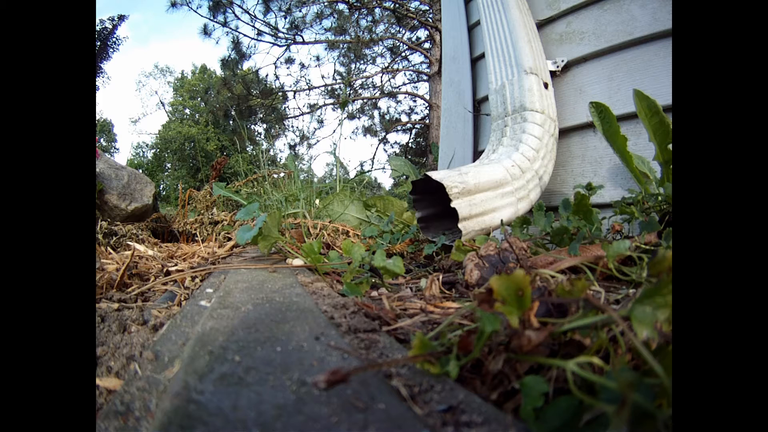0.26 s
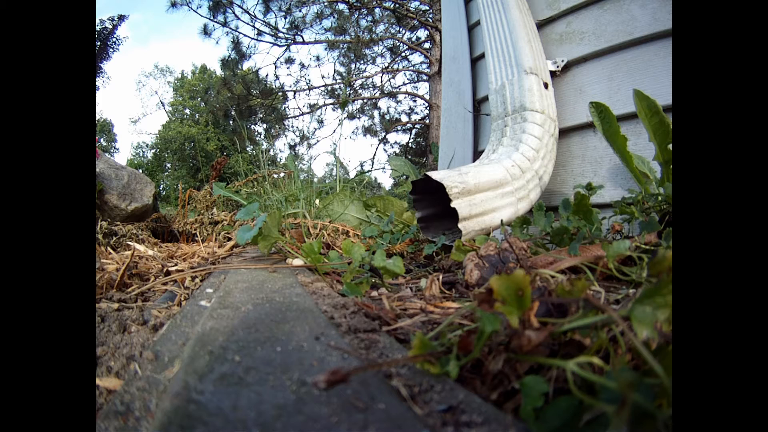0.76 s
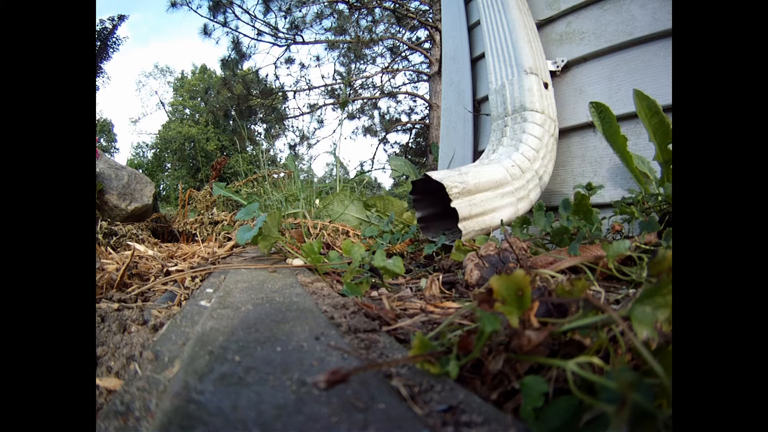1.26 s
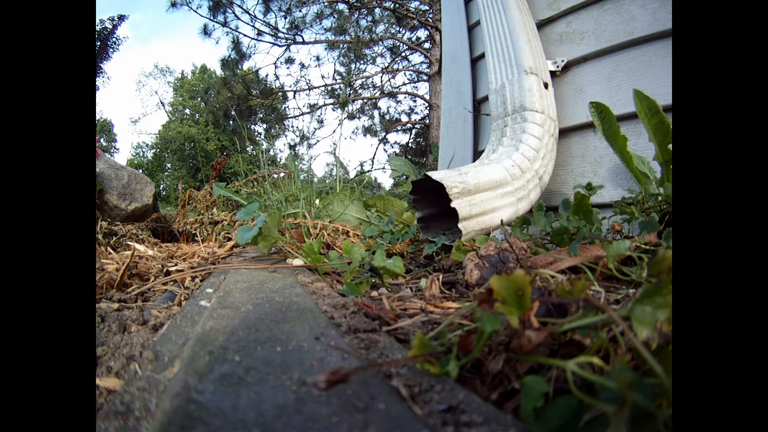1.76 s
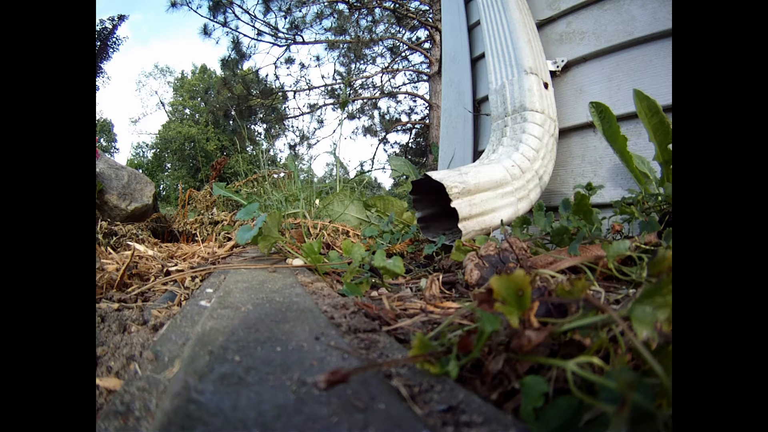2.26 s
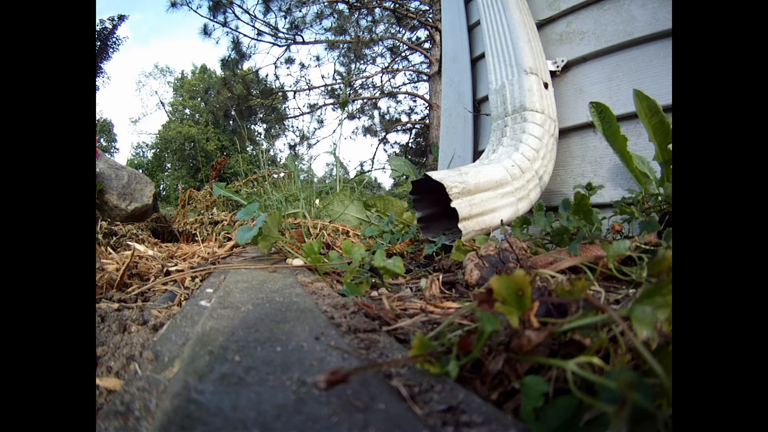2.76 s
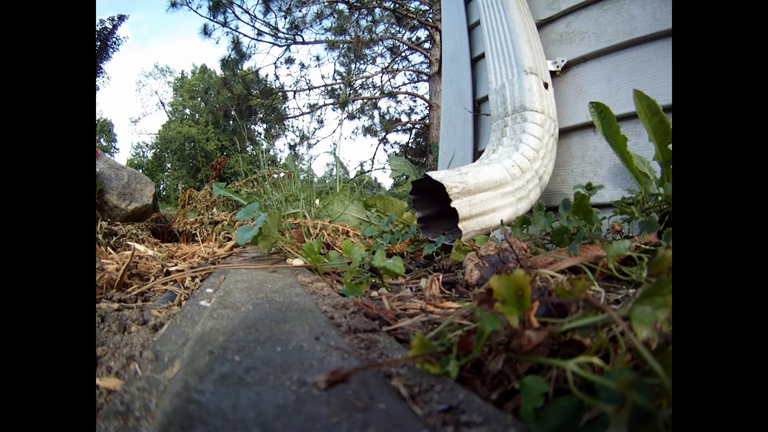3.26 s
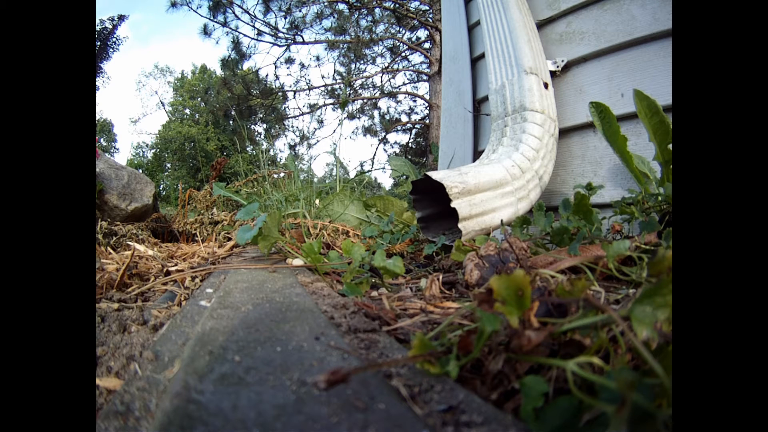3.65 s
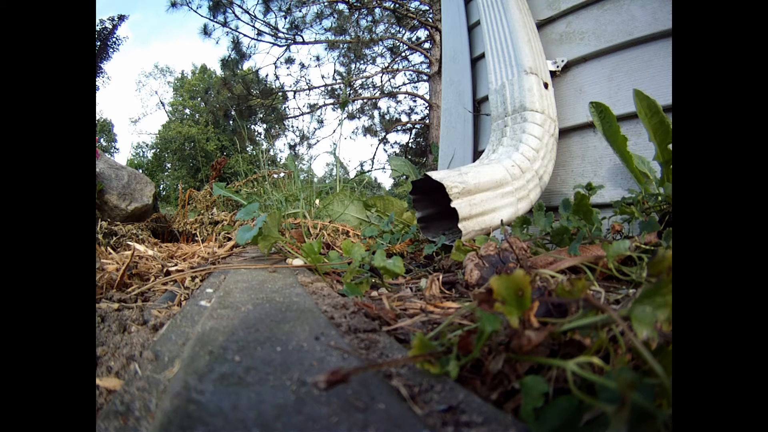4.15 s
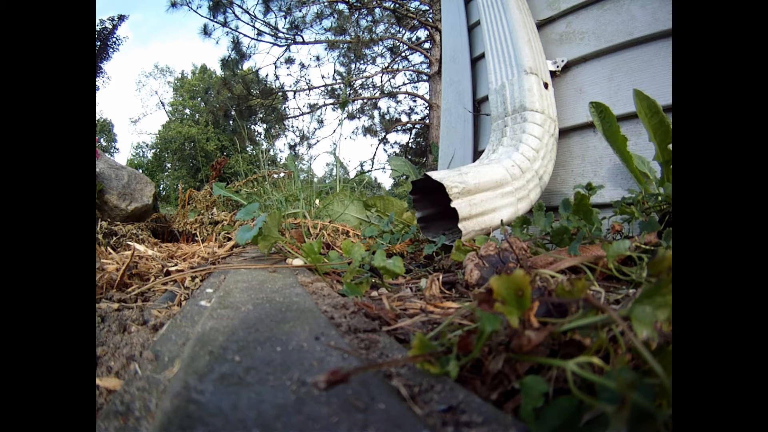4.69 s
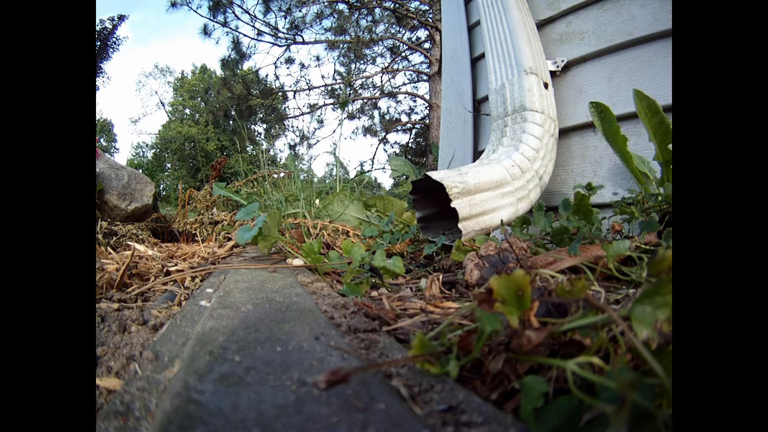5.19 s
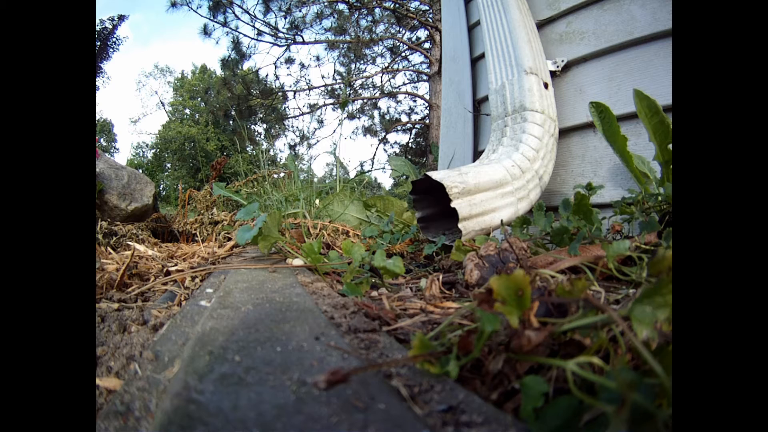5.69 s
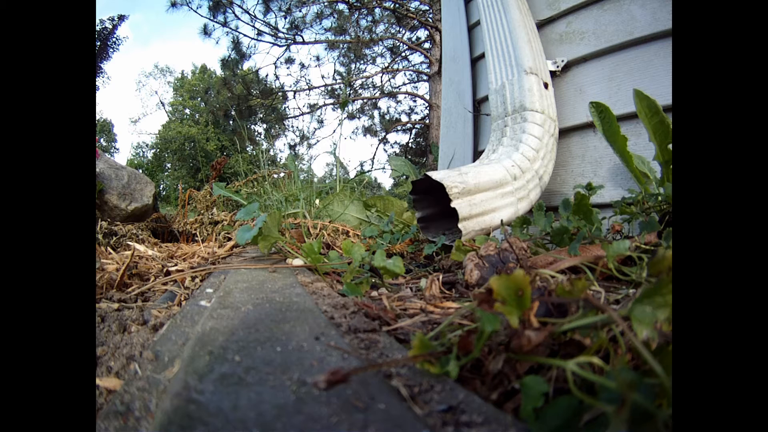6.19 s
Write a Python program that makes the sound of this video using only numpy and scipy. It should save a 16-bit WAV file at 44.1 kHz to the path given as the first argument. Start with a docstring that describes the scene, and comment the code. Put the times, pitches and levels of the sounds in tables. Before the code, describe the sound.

A steady low hum of two distant motors and a soft airy hiss run throughout this garden scene. Dry leaves scuffle faintly at the start and again around 1 second. At about 1.15 seconds a nearby chipmunk gives one sharp, high, falling chip, by far the loudest sound, with a brief overload crackle and a soft dull bump. A quieter trill of eight rapid falling notes follows until 1.6 seconds. Light ticks, snaps and tiny knocks in the leaves continue to about 3 seconds as it runs away, then thin to occasional ticks. From 3 seconds a distant songbird gives three very faint falling whistles, then six evenly spaced buzzy notes between 4.3 and 6 seconds. A faraway dog gives one faint, hoarse bark at about 6.2 seconds. The small microphone on the ground gives the high sounds a glassy, low-fidelity sheen.

```python
"""A chipmunk in a garden

Beside a downspout a chipmunk gives one sharp, falling chip, loud enough to overload the microphone,
then a quick trill as it darts off through snapping dry leaves. Far away a songbird whistles, a dog
barks once and two motors hum. A small camera on the ground samples it all at a low rate, which
mirrors the treble into a glassy sheen."""
import sys
import numpy as np
from scipy import signal
from scipy.fft import rfft, irfft, next_fast_len
from scipy.io import wavfile

SR = 44100
rng = np.random.default_rng(int(sys.argv[2]) if len(sys.argv) > 2 else 0)


def transcribe(signal):
    """Save signal, clipped to [-1, 1], as a 16-bit WAV file at the path in sys.argv[1]."""
    frames = np.atleast_2d(signal).T
    limited = np.clip(frames, -1, 1)
    pcm = np.round(limited * 32767).astype(np.int16)
    wavfile.write(sys.argv[1], SR, pcm)


N = 283563
TIME = np.arange(N) / SR
FFT_SIZE = next_fast_len(N + SR // 10)
FREQS = np.fft.rfftfreq(FFT_SIZE, 1 / SR)

# Levels in the tables are relative: the functions set the final loudness.
# harsh crackles of overload as the loud chip hits the microphone: start_s, length_s, level_db
CRACKLES = [(1.141, .006, -17.5), (1.1529, 0.0011, -16)]
# tone colour of the crackle: frequency_hz, level_db
CRACKLE_COLOUR = [(100, -17), (320, -6), (450, -1.5), (620, -15.5), (850, 2.5), (1200, -9), (1800, -5.5),
                  (2400, -10), (4000, 2), (5500, 1.5), (7000, -10.5)]
# its stereo width: frequency_hz, side_db
CRACKLE_WIDTH = [(550, -11.5), (1100, -6.5), (1800, -15.5), (3200, -15.5), (5500, -5)]
# notes of the trill: start_s, fall_octaves, level_db
TRILL_NOTES = [(1.208, .19, -27), (1.253, .25, -26), (1.2975, .3, -24), (1.346, .26, -22.5),
               (1.3935, .47, -25), (1.443, .5, -26), (1.493, .35, -26), (1.5415, .59, -28)]
# echoes off the house wall and stones: delay_s, level_db
ECHOES = [(.0046, -23), (0.0121, -13.5), (0.0179, -16.5), (0.03, -24)]
# scuffles in the leaves: start_s, length_s, level_db
SCUFFLES = [(0.0, 0.014, -34), (0.275, .07, -53), (0.504, 0.0046, -51), (0.732, 0.011, -55.5),
            (0.989, 0.0061, -36.5), (1.112, 0.031, -38.5), (1.243, 0.059, -37.5), (1.436, 0.12, -48.5),
            (2.111, 0.0086, -41), (2.263, 0.0086, -44.5), (2.318, 0.0072, -42), (2.521, 0.0056, -47)]
# tone colour of the leaves: frequency_hz, level_db
LEAF_COLOUR = [(150, -16.5), (500, -3.5), (900, 3.5), (1800, 0.5), (2300, 4.5), (2900, 0), (3600, 5.5),
               (4200, 0), (5400, 4.5)]
# the clearest dry ticks: start_s, level_db
TICKS = [(1.1155, -38), (1.2495, -35.5), (1.5928, -52), (1.6795, -44), (1.909, -50.5), (2.0488, -45),
         (2.3016, -40), (2.3116, -35.5), (2.358, -46.5), (2.515, -46), (2.5346, -42.5), (2.7148, -54),
         (2.749, -46.5), (2.9718, -46.5), (3.2126, -50), (3.3925, -57.5), (3.489, -52), (4.3083, -51),
         (4.6416, -50.5), (5.2624, -49.5), (5.906, -53.5)]
# how a tick rings: pitch_hz, width_hz, level_db
TICK_RINGS = [(2273, 49, 2.5), (3830, 700, -8), (5200, 210, -8.5), (5370, 240, 6)]
# sharp little knocks among the leaves: start_s, level_db
KNOCKS = [(2.109, -45), (2.2567, -38)]
# how a knock rings: pitch_hz, width_hz, level_db
KNOCK_RINGS = [(1020, 180, 8), (2330, 190, -23), (5050, 340, 0)]
# tone colour of the dull bump: frequency_hz, level_db
BUMP_COLOUR = [(20, 5.5), (70, 6.5), (220, -4.5), (450, -11), (900, -31)]
# the bird's opening whistles: start_s, length_s, start_pitch_hz, level_db
BIRD_WHISTLES = [(3.05, .2, 2950, -67), (3.63, .39, 5200, -64), (4.06, .12, 2250, -68)]
# tone colour of the bark: frequency_hz, level_db
BARK_COLOUR = [(410, -26), (680, -20), (830, -1), (1000, -5), (1240, 0), (1400, -10), (1650, -5),
               (2070, -15), (2500, -14), (3400, -22), (5000, -45)]
# tones in each motor's hum: multiple_of_shaft_rate, level_db
SLOW_MOTOR = [(1, -63.5), (2, -46), (3, -50.5), (4, -54.5), (5, -49.5), (6, -71), (7, -56.5), (8, -54.5),
              (10, -69.5)]
FAST_MOTOR = [(1, -60.5), (2, -46), (4, -55.5)]
# the faster motor swells and sinks on the breeze: time_s, level_db
FAST_MOTOR_SWELL = [(0, -1), (.75, 2.5), (2.3, 1.5), (3.8, -0.5), (6.43, -1)]
# tone colour of the outdoor air: frequency_hz, level_db
AIR_COLOUR = [(15, -18), (35, 6), (60, 5.5), (115, -3), (160, 4), (230, -6), (270, -7), (430, -15),
              (520, -17), (1000, -19.5), (2000, -22.5), (3500, -25.5), (5300, -26.5), (6000, -36.5)]
# stereo width of the air: frequency_hz, side_db
AIR_WIDTH = [(190, -37), (330, -27), (580, -18), (1800, -15), (5500, -11)]
# the camera's treble cut ahead of sampling: frequency_hz, gain_db
INPUT_FILTER = [(5350, -1.5), (5600, -4.5), (5850, -8.5), (6150, -21), (7000, -24.5), (9000, -52)]


def chipmunk():
    """The chip, with a crackle of microphone overload, then the trill, all with nearby echoes."""
    noise_level = np.maximum(overload_level(), noise_swell_level())
    direct = chip() + noise_level * noise(CRACKLE_COLOUR) + trill()
    echoes = sum(from_db(db) * delayed(direct, delay) for delay, db in ECHOES)
    near = from_db(-14) * reverb(direct, fade_s=.13, side_db=-13)
    far = from_db(-28) * reverb(direct, fade_s=.633, side_db=-12.5)
    # the low end of the slide lingers in the hollow corner by the spout
    hollow = from_db(-7) * reverb(resonance(direct, hz=3020, width_hz=400), fade_s=.19, side_db=-20)
    # the noise sounds wider than the whistle
    spread = sideways(noise_level * coloured(noise(CRACKLE_COLOUR), CRACKLE_WIDTH))
    # small surfaces throw back only the treble
    treble_only = signal.butter(1, 1800, "high", fs=SR, output="sos")
    return direct + spread + hollow + signal.sosfilt(treble_only, echoes + near + far)


def chip(start_s=1.153, pitch_hz=5080, lowest_hz=2800, octaves_per_s=44, sag_db_per_s=550):
    """One whistle slides down to the bottom of the voice: a brief pip, a loud core, a soft end."""
    since = np.clip(TIME - start_s, -.012, .1)
    pitch = np.maximum(pitch_hz * .5 ** (octaves_per_s * since), lowest_hz)
    pip = from_db(-3) * burst(1.1472, .0015, attack_s=.00082, release_s=.00082)
    core = from_db(-2.8 - sag_db_per_s * since) * burst(start_s, .0058, attack_s=.0022, release_s=.0018)
    end = from_db(-20) * burst(start_s, .022, attack_s=.0022, release_s=.0018)
    return np.max([pip, core, end], axis=0) * np.sin(phase_of(pitch))


def trill(centre_hz=4120, quaver_db=3.5):
    """Quavering notes, about twenty a second; each holds its pitch for a moment, then drops."""
    notes = []
    for start, octaves, db in TRILL_NOTES:
        length = .0105 + .0125 * octaves   # wider falls take longer
        half_fall = 2 ** (octaves / 2)
        notes.append((start, length, centre_hz * half_fall, centre_hz / half_fall, db))
    return from_db(1 + quaver_db * drift(280)) * slides(notes, bend=2, taper=.7, swell_db=-3)


def overload_level():
    """Loudness of the harsh crackle of overload as the loud chip hits the microphone."""
    return sum(from_db(db) * burst(start, length, .00082, .0012) for start, length, db in CRACKLES)


def noise_swell_level():
    """Loudness of a short swell of noise just before the chip."""
    return from_db(-27.5) * burst(CRACKLES[0][0], 0, attack_s=.01388, release_s=.009)


def leaves(gone_s=2.2, snaps_per_s=5000):
    """Each scuffle is a clump of tiny, uneven snaps; the leaves stir faintly until the animal has gone."""
    scuffles = sum(from_db(db) * burst(start, length, .009, .034) for start, length, db in SCUFFLES)
    stirring = from_db(-62 + 5 * drift(6.7)) * (TIME < gone_s)
    snap_moments = rng.random(N) < snaps_per_s / SR
    snaps = snap_moments * rng.standard_normal(N) * from_db(3 * drift(130))
    rustle = (scuffles + stirring) * unit_power(coloured(snaps, LEAF_COLOUR))
    return rustle + from_db(-9) * reverb(rustle, fade_s=.044, side_db=-18)


def ticks_and_knocks(run_start_s=1.6, run_end_s=2.9, count=10):
    """Dry ticks and knocks in the leaves, with fainter ticks at random as the animal runs off."""
    moments = run_start_s + (run_end_s - run_start_s) * (np.arange(count) + rng.random(count)) / count
    patter = list(zip(moments, -55 + 1.5 * rng.standard_normal(count)))
    ticks = touches(TICKS + patter, TICK_RINGS, attack_s=.001, release_s=.009, peak_delay_s=.0012)
    knocks = touches(KNOCKS, KNOCK_RINGS, attack_s=.0003, release_s=.0025, peak_delay_s=.0003)
    return from_db(-1.5) * ticks + from_db(4) * knocks


def touches(events, rings, attack_s, release_s, peak_delay_s):
    """Each scratchy touch is a short burst of noise that rings at a few pitches."""
    force = sum(from_db(db) * burst(start + peak_delay_s, 0, attack_s, release_s) for start, db in events)
    ringing = sum(from_db(db) * resonance(rng.standard_normal(N), hz, width) for hz, width, db in rings)
    return force * unit_power(ringing)


def bump():
    """A dull thud as the animal bolts, different on the left and right."""
    thud = noise(BUMP_COLOUR) + from_db(-1) * sideways(noise(BUMP_COLOUR))
    return from_db(-38) * burst(1.146, 0, attack_s=.004, release_s=.024) * thud


def far_bird(whistle_end_hz=1990, run_start_s=4.29, every_s=.308, top_hz=4500, bottom_hz=2950):
    """Falling whistles, then an even run of short buzzy ones, blurred by the trees."""
    opening = [(start, length, hz, whistle_end_hz, db) for start, length, hz, db in BIRD_WHISTLES]
    run = [(run_start_s + k * every_s, .11, top_hz, bottom_hz, -59) for k in range(6)]
    whistles = slides(opening, bend=1, taper=.2, swell_db=6.5) * (1 + drift(300))
    buzzes = slides(run, bend=1, taper=.2, swell_db=6.5) * drift(600)
    song = whistles + buzzes
    return from_db(-2) * (from_db(-8) * song + reverb(song, fade_s=.55, side_db=-16))


def far_dog(start_s=6.155, length_s=.09, pitch_hz=378, lift_hz=44, jitter=.045):
    """One hoarse bark: a push of effort lifts pitch and loudness, and the houses echo it."""
    effort = np.abs(np.sin(np.pi * np.clip((TIME - start_s) / length_s, 0, 1)))
    pitch = pitch_hz + lift_hz * effort
    phase = phase_of(pitch * (1 + jitter * drift(194.4)))
    tone = unit_power(sum(gain_at(BARK_COLOUR, k * pitch) * np.sin(k * phase) for k in range(1, 9)))
    # rushing breath pulses with every cycle of the voice
    breath = unit_power(noise(BARK_COLOUR) * (2 + np.cos(phase)))
    bark = from_db(-49) * effort ** 1.6 * unit_power(tone + from_db(-1) * breath)
    echoed = bark + from_db(-5) * delayed(bark, .052)
    return echoed + from_db(-5) * reverb(echoed, fade_s=.72, side_db=-39)


def machinery():
    """Two far motors hum; the faster one swells and sinks on the breeze."""
    slow = motor(SLOW_MOTOR, shaft_hz=25.77, wander=.00297, waver_db=2.5)
    fast = motor(FAST_MOTOR, shaft_hz=55.53, wander=.011, waver_db=3)
    swell = unit_power(from_db(np.interp(TIME, *np.transpose(FAST_MOTOR_SWELL))))
    return slow + swell * fast


def motor(tones, shaft_hz, wander, waver_db):
    """A slightly unsteady shaft makes a stack of tones, each wavering on its way through the air."""
    phase = phase_of(shaft_hz * (1 + wander * drift(2.06)))
    hum = np.zeros(N)
    for multiple, db in tones:
        level = np.sqrt(2) * from_db(db + waver_db * drift(4.9))
        hum += level * np.sin(multiple * phase + rng.uniform(0, 2 * np.pi))
    return hum


def air():
    """Distant rumble and soft hiss, wider in the treble."""
    return from_db(-49) * (noise(AIR_COLOUR) + sideways(coloured(noise(AIR_COLOUR), AIR_WIDTH)))


def slides(notes, bend, taper, swell_db):
    """Pure sliding notes; a bend over 1 holds the pitch at first, and taper softens both ends."""
    out = np.zeros(N)
    for start, length, start_hz, end_hz, db in notes:
        inside = (TIME >= start) & (TIME < start + length)
        progress = (TIME[inside] - start) / length
        pitch = start_hz * (end_hz / start_hz) ** (progress ** bend)
        level = from_db(db + swell_db * (progress - .5)) * np.abs(np.sin(np.pi * progress)) ** taper
        out[inside] += level * np.sin(phase_of(pitch))
    return out


def burst(start_s, hold_s, attack_s, release_s):
    """A loudness curve that rises to 1 at start_s, holds, then dies away."""
    out = np.zeros(N)
    near = (TIME > start_s - 10 * attack_s) & (TIME < start_s + hold_s + 10 * release_s)
    rising = (start_s - TIME[near]) / attack_s
    falling = (TIME[near] - start_s - hold_s) / release_s
    out[near] = np.exp(-np.maximum(np.maximum(rising, falling), 0))
    return out


def reverb(x, fade_s, side_db):
    """Plants, ground and walls scatter sound into a stereo tail that drops 60 dB in fade_s."""
    t = np.arange(SR) / SR
    build_up = 1 - np.exp(-(t / .006) ** 2)
    tails = rng.standard_normal((2, SR)) * from_db(-60 * t / fade_s) * build_up
    mid, side = [signal.fftconvolve(x, tail / np.linalg.norm(tail))[:N] for tail in tails]
    return mid + from_db(side_db) * sideways(side)


def resonance(x, hz, width_hz):
    """Ring at one pitch, letting through only a band around it."""
    r = np.exp(-np.pi * width_hz / SR)
    feedback = [1, -2 * r * np.cos(2 * np.pi * hz / SR), r * r]
    return signal.lfilter(np.array([1, 0, -1]) * (1 - r * r) / 2, feedback, x)


def drift(rate_hz, step=16):
    """A smooth random wobble of size about 1, mostly slower than rate_hz."""
    count = FFT_SIZE // step
    smoothing = 1 + (np.fft.rfftfreq(count, step / SR) / rate_hz) ** 2
    slow = irfft(rfft(rng.standard_normal(count)) / smoothing)
    return unit_power(np.interp(np.arange(N) / step, np.arange(len(slow)), slow))


def noise(colour):
    """Noise with a tone colour and a power of 1."""
    return unit_power(coloured(rng.standard_normal(N), colour))


def coloured(x, colour):
    """Give a sound a tone colour."""
    return filtered(x, gain_at(colour, FREQS))


def filtered(x, gain):
    """Apply one gain per frequency."""
    return irfft(rfft(x, FFT_SIZE) * gain, FFT_SIZE)[..., :N]


def gain_at(colour, hz):
    """Read the gain between the rows of a colour table, on a log-frequency scale."""
    row_hz, row_db = np.transpose(colour)
    return from_db(np.interp(np.log(hz + 1e-9), np.log(row_hz), row_db))


def delayed(x, delay_s):
    """The same sound, arriving later."""
    return np.interp(TIME - delay_s, TIME, x)


def sideways(x):
    """Opposite signs on the left and right, which adds width."""
    return x * [[1], [-1]]


def phase_of(hz):
    """Running phase of a pitch curve."""
    return 2 * np.pi * np.cumsum(hz) / SR


def unit_power(x):
    """Scale to an average power of 1."""
    return x / np.sqrt(np.mean(x ** 2) + 1e-20)


def from_db(db):
    """Decibels to gain."""
    return 10 ** (np.asarray(db) / 20)


def scene():
    """The near animal, slightly to the right, over the garden's background."""
    hum = machinery()
    clicks = ticks_and_knocks()
    near = (chipmunk() + leaves() + clicks) * from_db([[-.3], [.3]])
    return near + bump() + far_bird() + far_dog() + hum + air()


def record(dry, sampler_hz=12000, cutoff_hz=10480):
    """The camera samples and holds at a low rate: each tone gains a mirror image around half that rate."""
    mirrored = coloured(dry, INPUT_FILTER) * (1 + 2 * np.cos(2 * np.pi * sampler_hz * TIME))
    held = filtered(mirrored, np.sinc(FREQS / sampler_hz))
    return filtered(held, 1 / np.sqrt(1 + (FREQS / cutoff_hz) ** 240))


dry = scene()
out = record(dry)
transcribe(out)
```